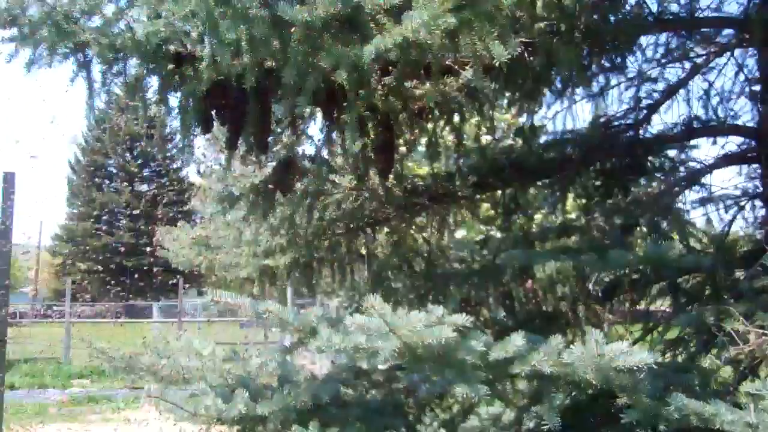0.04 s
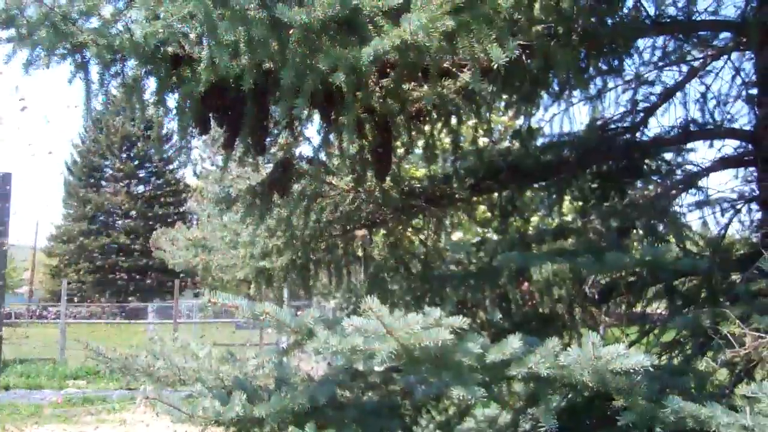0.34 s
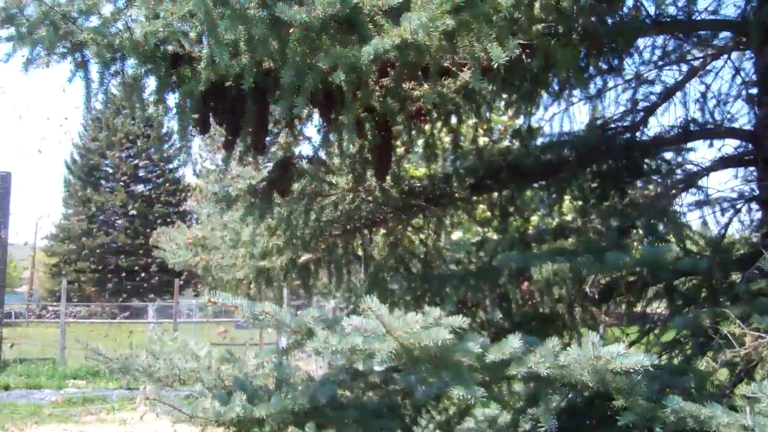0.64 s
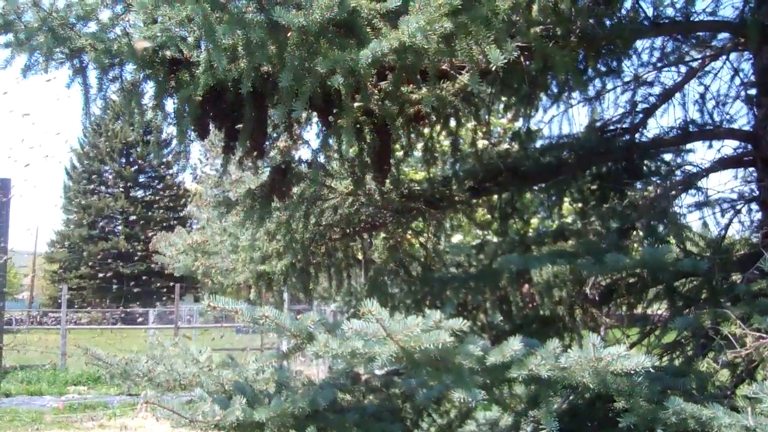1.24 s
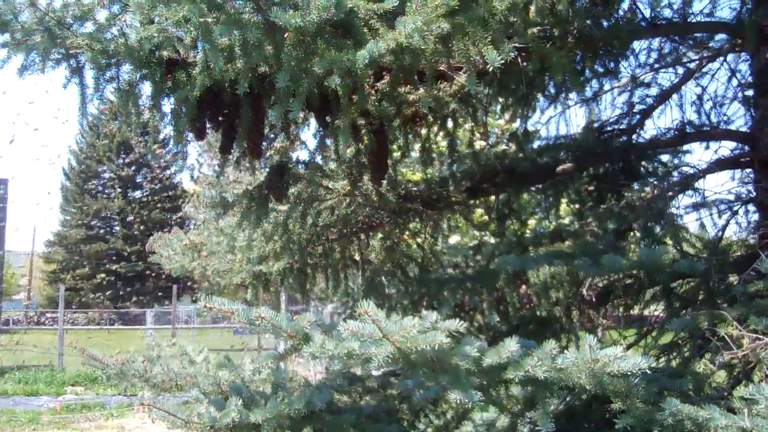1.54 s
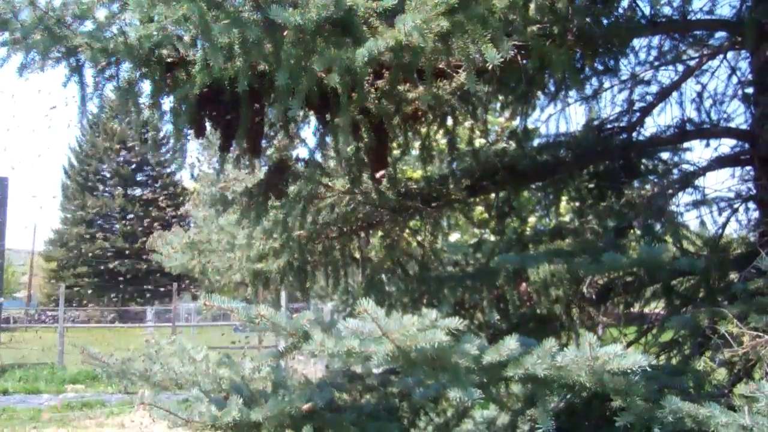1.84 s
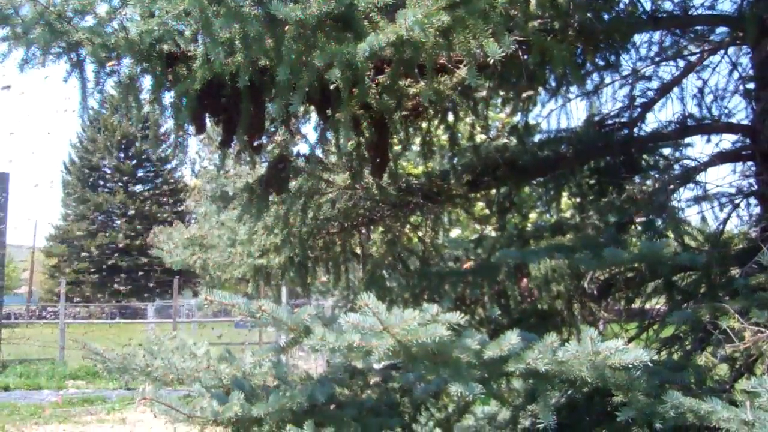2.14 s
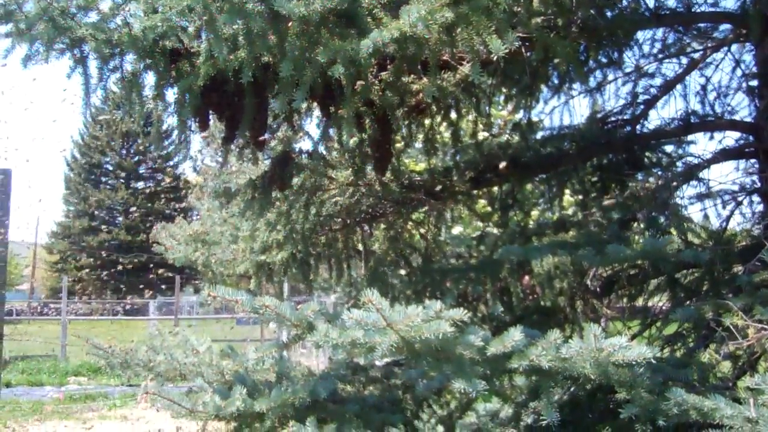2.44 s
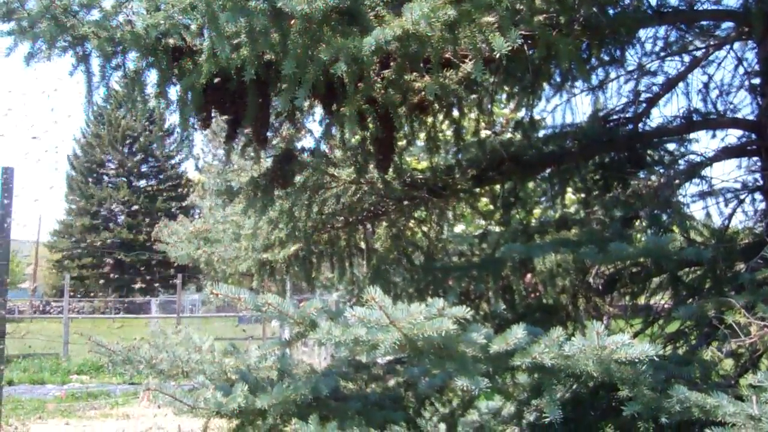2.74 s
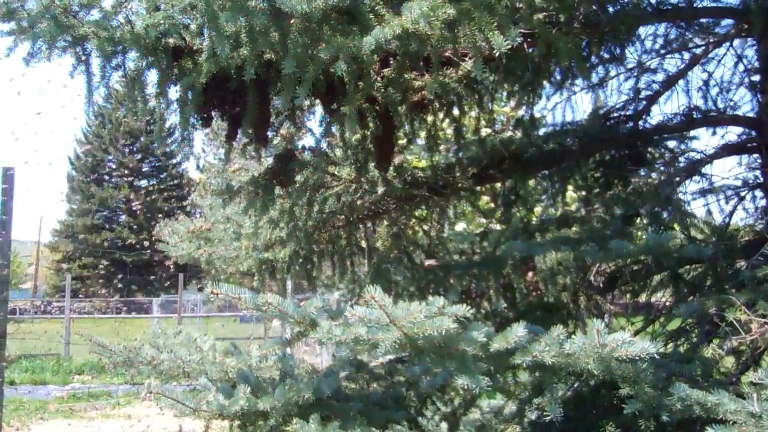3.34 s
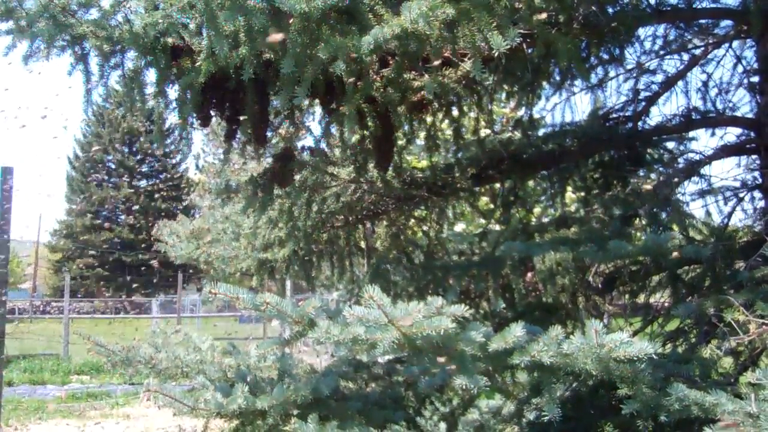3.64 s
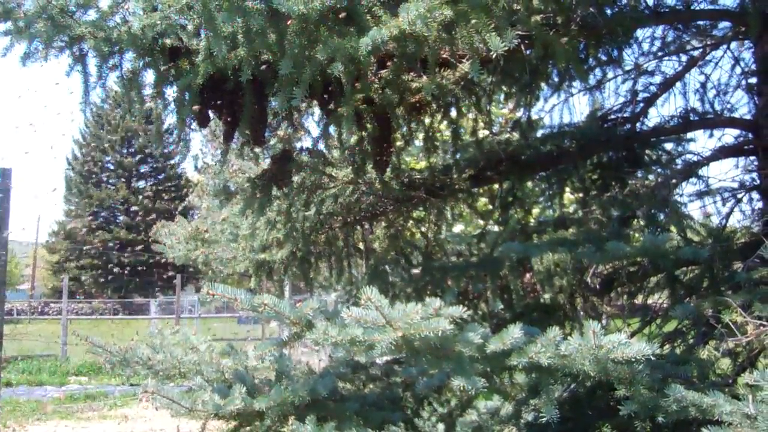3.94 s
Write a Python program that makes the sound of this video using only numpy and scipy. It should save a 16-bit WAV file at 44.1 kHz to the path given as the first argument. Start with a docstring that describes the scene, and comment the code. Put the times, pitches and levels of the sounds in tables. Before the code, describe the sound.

A swarm of honeybees buzzes steadily around a tree outdoors.

```python
"""Outdoors by a spruce, a small stereo microphone stands near a circling swarm of honeybees.
Every bee is a train of wing strokes with its own wandering rate and distance; together they make a
steady buzz, with a few close bees standing out. Under it lie an even hiss, a faint outdoor rumble,
a far engine that slowly speeds up and a low hum. Everything leans to the left."""
import sys
import numpy as np
from scipy import signal
from scipy.fft import rfft, irfft
from scipy.io import wavfile

SR = 44100
rng = np.random.default_rng(int(sys.argv[2]) if len(sys.argv) > 2 else 0)


def unload_audio(sound):
    """Save the sound as a 16-bit wav file, at the path given as the first command line argument."""
    columns = np.transpose(np.atleast_2d(sound))
    # keep every value between -1 and 1, then stretch to whole-number steps
    steps = np.round(np.clip(columns, -1, 1) * 32767)
    wavfile.write(sys.argv[1], SR, steps.astype(np.int16))


N = 176400
T, HZ = np.arange(N) / SR, np.fft.rfftfreq(N, 1 / SR)


def amp(db):
    """Decibels to gain."""
    return 10 ** (np.asarray(db) / 20)


def unit_rms(x):
    """Scales to unit rms."""
    return x / np.sqrt(np.mean(x ** 2) + 1e-20)


def envelope(table):
    """Gain at every sample from rows of t/s, level/dB."""
    return amp(np.interp(T, *np.transpose(table)))


def over_frequency(table):
    """The columns of a table at every frequency, joined on a log axis."""
    f, *columns = np.transpose(table)
    return [np.interp(np.log(HZ + 1), np.log(f), c) for c in columns]


def drift(t, top_hz, count=12):
    """A slow random wander of unit size, no faster than top_hz."""
    f = top_hz * 10 ** -rng.random((count, 1))
    weight = 1 / np.sqrt(f)
    waves = weight * np.sin(2 * np.pi * (f * t + rng.random((count, 1))))
    return waves.sum(0) / np.sqrt((weight ** 2).sum() / 2)


# The microphone's two ports: f/Hz, left over right/dB, coherence/0-1, lead of the left/rad
MIC_PORTS = [(60, 6, 0.95, .01), (200, 2.5, 0.98, .04), (500, 2.5, 0.99, 0.16), (1180, 3, 0.95, 0.32),
             (2100, 4.5, 0.72, 0.29), (4030, 3, 0.57, 0.6), (5960, 5.2, 0.4, 1.54), (8300, 9.5, .3, 2.3),
             (9700, 14, 0.3, 0.99), (10900, 7.5, 0.14, .2), (12500, 0.5, .25, .1)]
def at_microphone(pair, spectrum, rms_db):
    """Colours two unrelated signals and shares them between the ports, less alike in the treble."""
    common, separate = rfft(pair)
    balance_db, coherence, lead = over_frequency(MIC_PORTS)
    left = common * amp(balance_db / 2)
    right = coherence * common + np.sqrt(1 - coherence ** 2) * separate
    right *= amp(-balance_db / 2) * np.exp(-1j * lead)
    colour = amp(over_frequency(spectrum)[0]) * (HZ > 20)
    colour /= np.sqrt(amp(balance_db) + amp(-balance_db))  # the balance adds no power
    return amp(rms_db) * unit_rms(irfft(np.array([left, right]) * colour, N))


def bees(count, wander, turn_hz, swing_db, jitter, strokes=1400, oversample=4):
    """One sharp pulse per wing stroke; each bee's rate and loudness wander as it turns, nears, leaves."""
    commonest_hz, spread_below_hz, spread_above_hz = 251.4, 21.007, 10.5
    rates = np.arange(150, 320, .5)
    spread = np.where(rates < commonest_hz, spread_below_hz, spread_above_hz)
    share_below = np.cumsum(np.exp(-.5 * ((rates - commonest_hz) / spread) ** 2))
    ranks = (np.arange(count) + rng.random(count)) / count
    pulses = np.zeros(N * oversample)
    for wingbeat_hz in np.interp(ranks, share_below / share_below[-1], rates):
        t = np.arange(strokes) / wingbeat_hz
        beats = np.cumsum(1 + wander * drift(t, turn_hz)) - 1 - rng.random()
        stroke_s = (beats + jitter * rng.standard_normal(strokes)) / wingbeat_hz
        strength = rng.choice([-1, 1]) * unit_rms(amp(swing_db * drift(t, turn_hz / 2)))
        index = np.round(stroke_s * SR * oversample).astype(int)
        inside = (index >= 0) & (index < len(pulses))
        pulses[index[inside]] += strength[inside]
    return irfft(rfft(pulses)[:len(HZ)], N)  # back down to SR


def foliage(pair, t60_s, wet_db, taps=6000):
    """Branches and ground scatter each stroke into a short diffuse tail."""
    tail = rng.standard_normal((2, taps)) * amp(-60 * T[:taps] / t60_s)
    tail *= amp(wet_db) / np.linalg.norm(tail, axis=1, keepdims=True)
    return pair + signal.fftconvolve(pair, tail, axes=1)[:, :N]


# Tone of a wing stroke at the microphone: f/Hz, relative level/dB
WING_STROKE_TONE = [(120, -30), (200, -6.5), (250, -8), (320, -8), (420, -1), (500, 0), (600, -6.5),
                    (760, -7), (980, -3), (1270, -5), (1450, -8.5), (1950, -12), (2500, -12), (4500, -16),
                    (7000, -18.5), (9500, -19), (12000, -26.5), (14000, -43)]
# Slight swell of the swarm around the tree: t/s, relative level/dB
SWARM_SWELL = [(0, -1), (.45, -0.8), (1.5, -0.15), (2.7, -0.5), (3.3, 0.1), (4, 0.2)]
def swarm():
    """Farther off, the mass of bees blurs into broad harmonics; a few fly close to the microphone."""
    far = [bees(count=120, wander=.02, turn_hz=4, swing_db=2.5, jitter=.0044) for _ in range(2)]
    near = [bees(count=14, wander=.024, turn_hz=4, swing_db=4, jitter=.0042) for _ in range(2)]
    scattered = foliage(np.array(far), t60_s=.063, wet_db=-16)
    mass = at_microphone(scattered, WING_STROKE_TONE, rms_db=-37.5)
    closest = at_microphone(np.array(near), WING_STROKE_TONE, rms_db=-46)
    return (mass + closest) * envelope(SWARM_SWELL)


# Hiss behind the bees: f/Hz, relative level/dB
HISS_SPECTRUM = [(300, -4), (1500, -3), (4500, 1), (7000, -1.5), (9500, 1), (10300, -1), (12000, -13.5),
                 (14000, -20)]
def hiss():
    """Even, broad noise that falls away above 10 kHz."""
    return at_microphone(rng.standard_normal((2, N)), HISS_SPECTRUM, rms_db=-42.5)


# Rumble of the open air: f/Hz, relative level/dB
RUMBLE_SPECTRUM = [(20, -22), (31, -16), (42, 3), (75, 8.5), (130, 5), (190, 1), (320, 0), (800, -19)]
# Its rise and fall: t/s, relative level/dB
RUMBLE_LEVEL = [(0, -5), (2.1, -5), (2.25, 2), (2.45, -4.5), (4, -3)]
def outdoor_rumble():
    """Faint low noise that swells once, briefly, just past halfway."""
    noise = rng.standard_normal((2, N))
    return at_microphone(noise, RUMBLE_SPECTRUM, rms_db=-58) * envelope(RUMBLE_LEVEL)


# Engine in the distance: t/s, f/Hz, level/dB
ENGINE_RUN = [(0, 41, -72), (1.2, 41, -84), (1.8, 41.9, -64), (2.5, 44.5, -63), (3.199, 48.5, -61),
              (3.45, 50, -66), (4, 53.4, -63)]
def far_engine():
    """The firing note of a far engine climbs as it speeds up."""
    times, firing_hz, level_db = np.transpose(ENGINE_RUN)
    phase = 2 * np.pi * np.cumsum(np.interp(T, times, firing_hz)) / SR
    return np.sqrt(2) * amp(np.interp(T, times, level_db)) * np.sin(phase)


# Low hum in the background: t/s, level/dB
HUM_LEVEL = [(0, -66), (1, -64.5), (1.25, -69.5), (2, -66), (2.25, -61), (2.8, -68), (4, -69)]
def low_hum(pitch_hz=103.7, waver_hz=1.6):
    """A single faint tone that wavers in pitch and level."""
    phase = 2 * np.pi * np.cumsum(pitch_hz + waver_hz * drift(T, top_hz=6.15)) / SR
    return np.sqrt(2) * envelope(HUM_LEVEL) * np.sin(phase)


def scene():
    """The swarm in front; hiss, rumble, engine and hum behind it."""
    slightly_left = amp([[1.3], [-1.3]])
    return swarm() + hiss() + outdoor_rumble() + (far_engine() + low_hum()) * slightly_left


def record(dry, start_s=.071, fade_s=.0019, cutoff_hz=14150):
    """The recorder opens just after the start and cuts off the highest treble."""
    opened = dry * np.clip((T - start_s) / fade_s, 0, 1)
    lowpass = signal.firwin(511, cutoff_hz, window=("kaiser", 9), fs=SR)
    return signal.oaconvolve(opened, lowpass[None], "same")


dry = scene()
out = record(dry)
unload_audio(out)
```